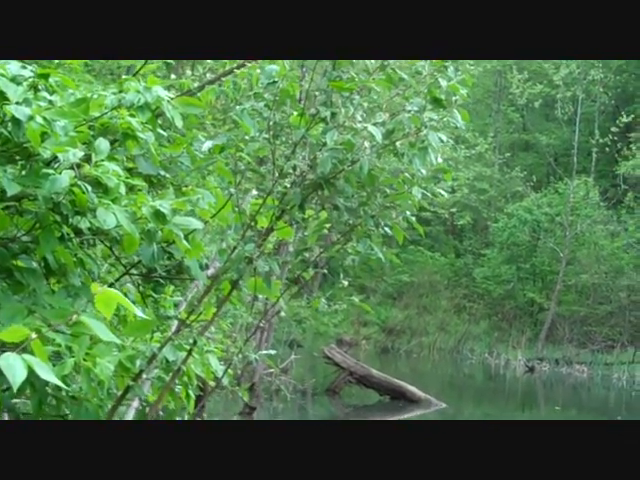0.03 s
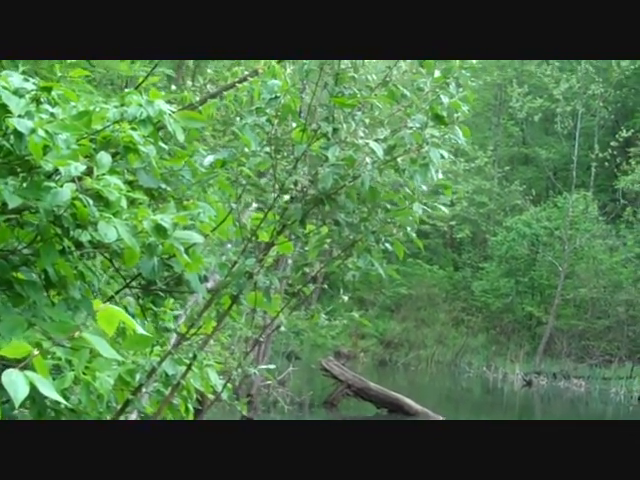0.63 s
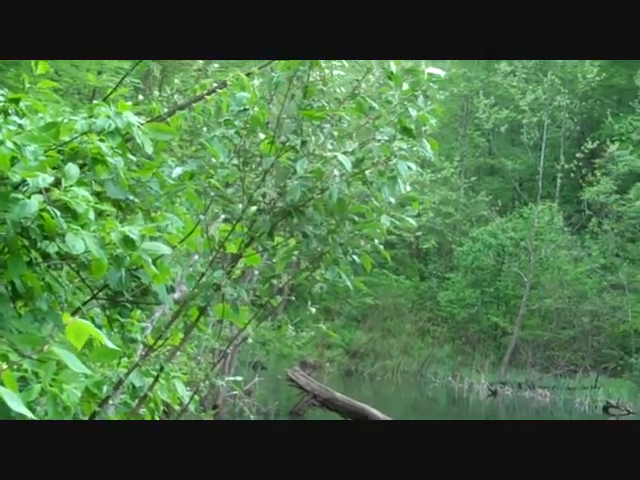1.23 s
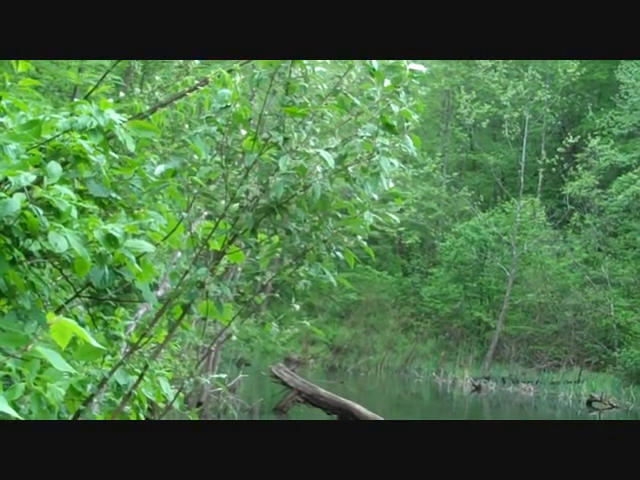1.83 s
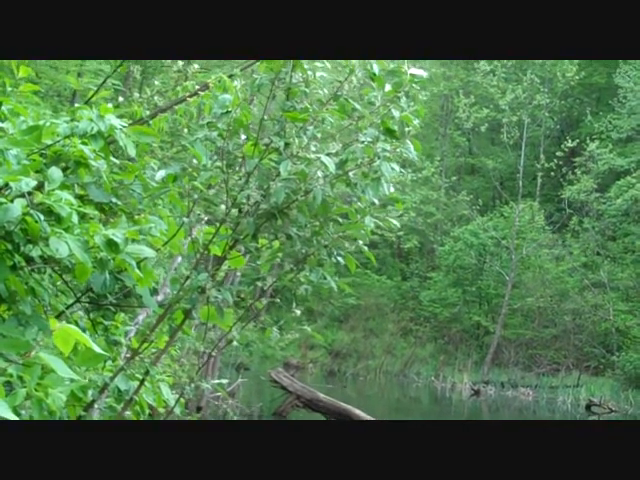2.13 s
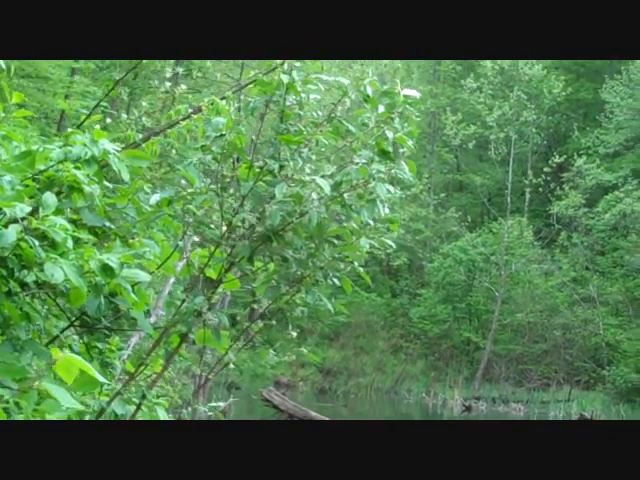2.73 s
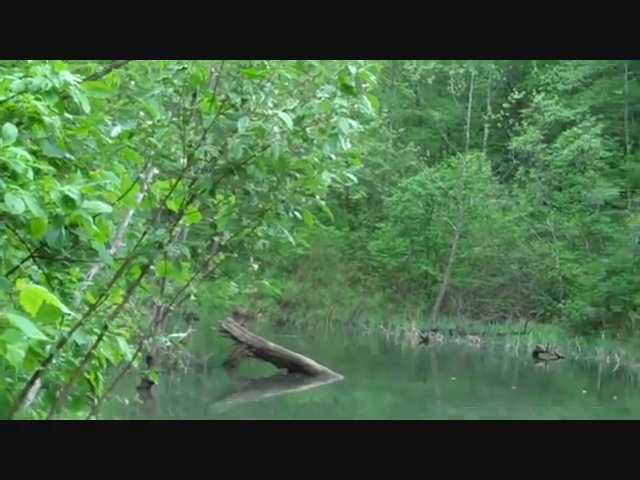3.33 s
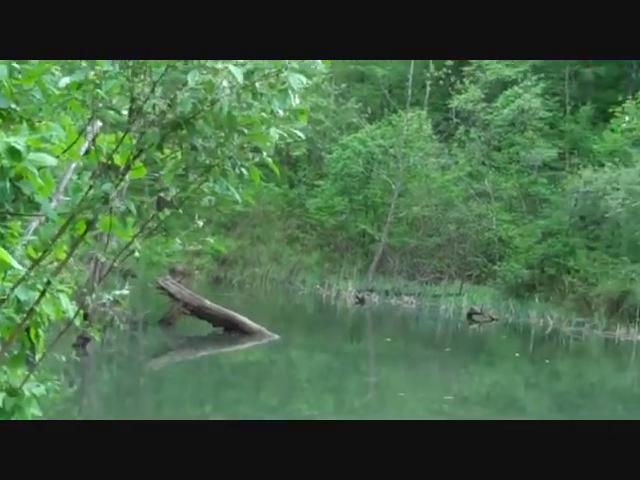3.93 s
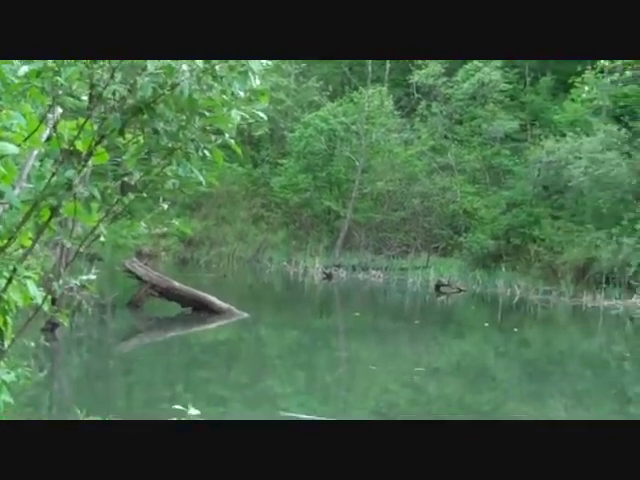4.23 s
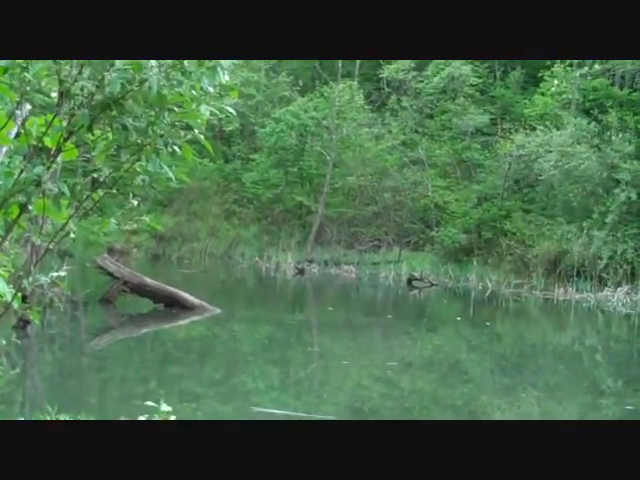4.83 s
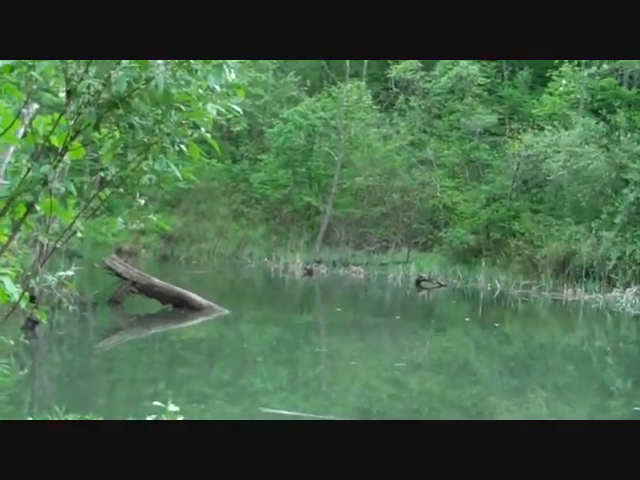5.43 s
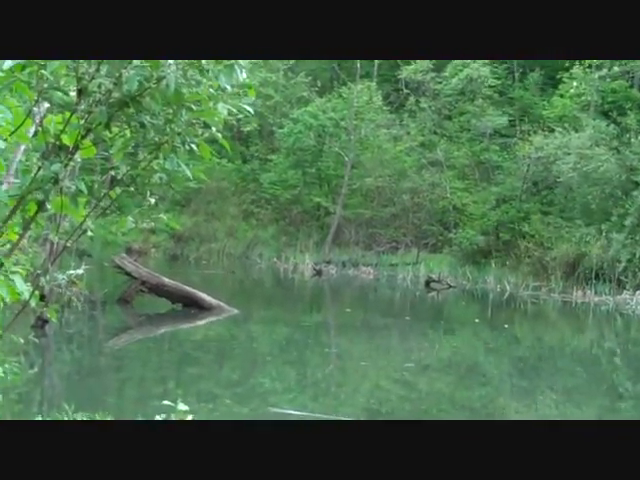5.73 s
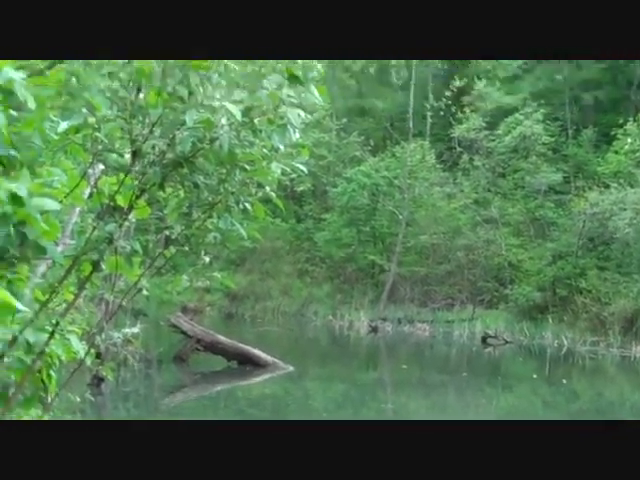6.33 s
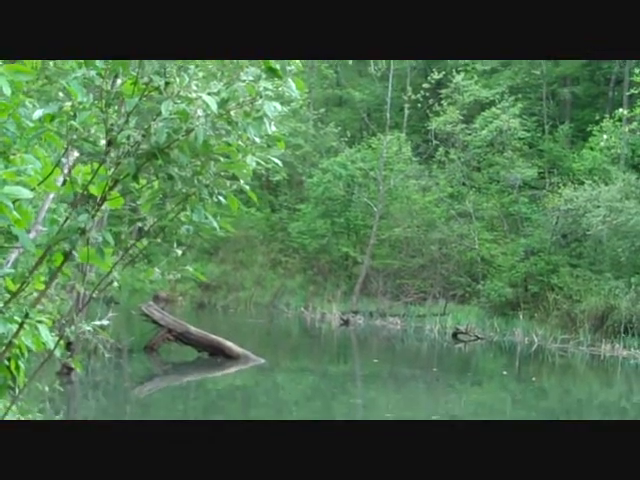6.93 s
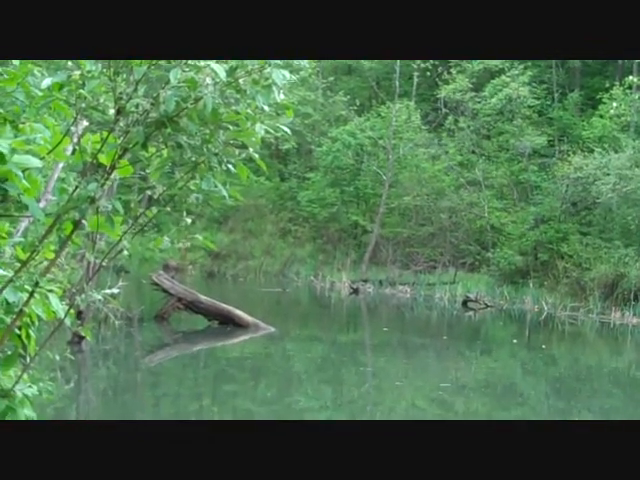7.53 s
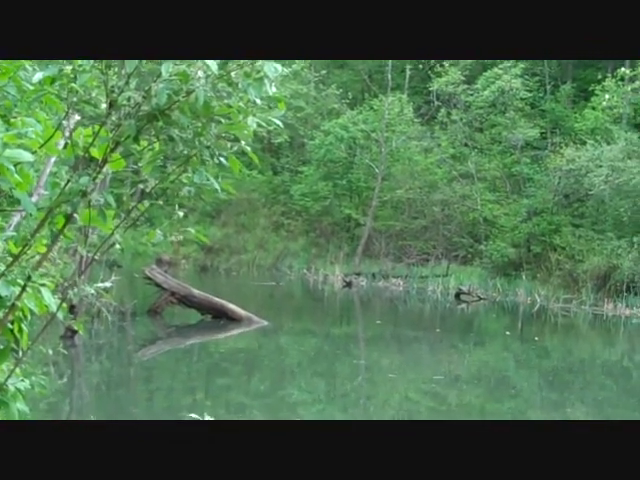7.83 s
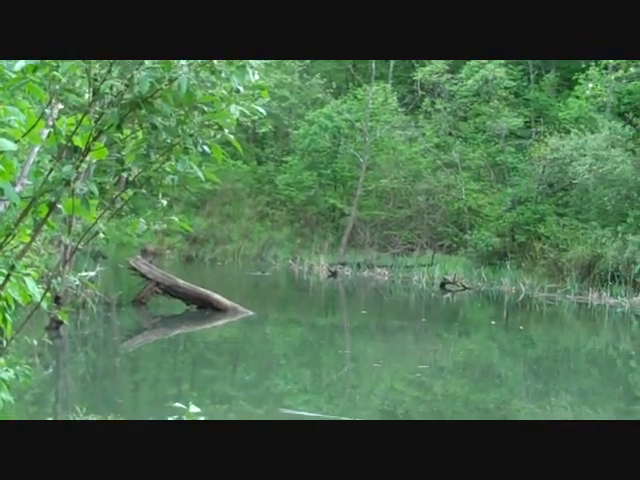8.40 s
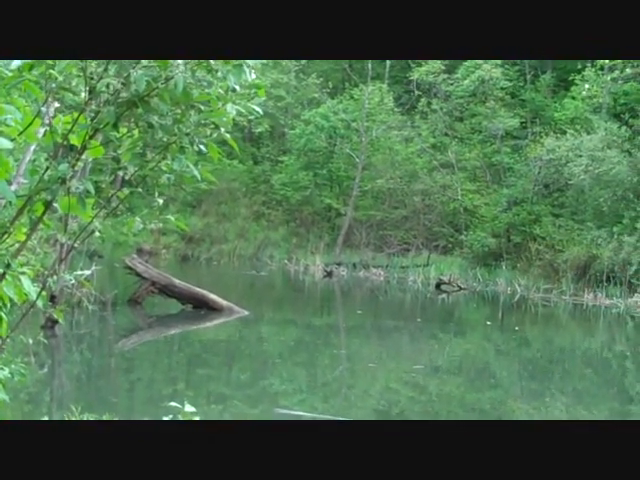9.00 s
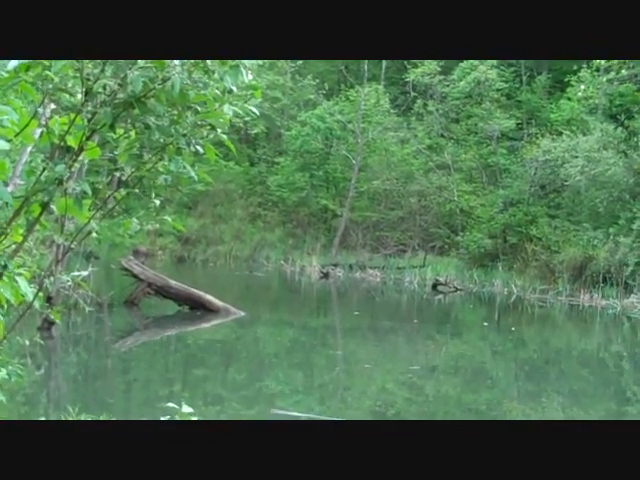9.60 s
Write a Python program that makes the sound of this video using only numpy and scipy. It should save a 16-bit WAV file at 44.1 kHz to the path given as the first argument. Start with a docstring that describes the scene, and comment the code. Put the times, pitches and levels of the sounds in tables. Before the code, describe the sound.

A soft hush of air and distant leaves runs throughout, by a woodland pond. For the first three seconds, leaves brush the handheld microphone, with a brief squeak at the start, and twigs click sharply against it, loudest near 2.7 seconds. Faint trills and chirps sound behind. A low finger bump comes at 3 seconds. Then a bird sings five high falling sweeps, growing louder, over a thin held whistle, and ends with a quick flourish from 4.1 to 4.7. A water bird gives six short, hoarse, faint hoots between 4.4 and 6.1. From 5.6 to 6.8 a slow fluted phrase on the left lingers among the trees. Occasional twig ticks and rustles return around 4, 4.5 and 5.6 seconds. From about 6.3, fingers lightly tap and rub the case while distant birds chatter, closing with quick trills from 9 to 9.5 seconds.

```python
"""Birds round a woodland pond

Small birds whistle sweeps, trills and fluted phrases, and a water bird hoots from the far bank.
Each note is a gliding tone that the trees scatter into a tail. Close by, twigs tick and leaves
brush against a handheld camera, and fingers ring its case, over a soft hush of air."""
import sys
import numpy as np
from scipy import signal
from scipy.fft import rfft, irfft, next_fast_len
from scipy.io import wavfile
from scipy.ndimage import uniform_filter1d

SR = 44100
rng = np.random.default_rng(int(sys.argv[2]) if len(sys.argv) > 2 else 0)


def persist_wave(psi):
    """Save psi, clipped to +-1, as 16-bit WAV."""
    counts = np.round(np.clip(psi, -1, 1) * 32767).astype(np.int16)
    wavfile.write(sys.argv[1], SR, np.atleast_2d(counts).T)


N = 426006

# The lead bird's falling sweep and the short note at its foot.
# Each holds: length in seconds, then start, middle and end pitch in Hz.
SWEEP_NOTE = (0.105, 8250, 7550, 6100)
FOOT_NOTE = (0.058, 7000, 6350, 6420)
# A thin held whistle that sags and recovers, and the lead bird's closing flourish.
# Each row: start and length in seconds, start, middle and end pitch in Hz, level in dB.
HELD_WHISTLE = [(3.40, 0.36, 4890, 4770, 4660, -66), (3.80, .35, 4610, 4730, 4820, -61)]
FLOURISH = [(4.113, 0.16, 5200, 4750, 4220, -54.5), (4.268, 0.07, 3480, 4205, 4850, -51),
            (4.32, 0.03, 4730, 4190, 3630, -57), (4.362, 0.03, 4930, 5300, 5550, -55),
            (4.38, 0.077, 5475, 5540, 5550, -54), (4.418, 0.056, 3457, 4140, 4740, -49),
            (4.464, 0.0287, 4560, 4170, 3720, -53.5), (4.47, 0.17, 5400, 5650, 5920, -65),
            (4.50, 0.029, 4680, 4340, 3900, -56), (4.536, 0.048, 3400, 2800, 2440, -59),
            (4.568, 0.053, 2430, 2308, 2430, -59), (4.608, 0.055, 2440, 3010, 3630, -59.5),
            (4.642, 0.041, 3780, 3450, 3050, -53)]

def near_song():
    """The lead bird's falling sweeps and flourish; a thin, wavering whistle sounds beneath."""
    sweeps = series(SWEEP_NOTE, first_s=3.176, period_s=.154, top_db=-46.5, swell_db=20, count=5)
    feet = series(FOOT_NOTE, first_s=3.265, period_s=.14, top_db=-53, swell_db=10, count=5)
    song = sing(sweeps + feet, waver=.012, overtone_db=-36, soft=.45)
    song += sing(HELD_WHISTLE, waver=.028, overtone_db=-36, soft=.4)
    song += sing(FLOURISH, waver=.017, overtone_db=-36, soft=.5)
    return woods(song, lead=2.4, wet_db=0, t60=1.8, left_db=-1, build_s=.025)


# The far birds' vocabulary. Each entry: length in seconds, then start, middle and end pitch in Hz.
SYLLABLES = {"rise": (.046, 2850, 3600, 4700), "fall": (0.04, 4780, 4400, 3800),
             "pip": (0.03, 2850, 3020, 2880), "thin": (0.14, 4980, 4780, 4810),
             "level": (.11, 2980, 3200, 3350), "arch": (0.0374, 3400, 3650, 2750),
             "plunge": (0.098, 7700, 5300, 2600), "low": (0.048, 2600, 2600, 2400),
             "drawl": (.13, 2380, 2680, 2920), "lift": (.06, 5020, 5200, 6000),
             "climb": (.058, 3600, 4600, 5800), "slide": (.028, 5700, 5500, 4450),
             "swing": (.04, 2600, 3050, 3300), "hook": (.05, 5100, 4480, 3600)}
# Their chatter. Each row: start in seconds, syllable, level in dB.
FAR_SONG = [(1.14, "drawl", -66), (1.345, "thin", -66.5), (1.44, "fall", -63), (2.58, "lift", -63),
            (2.642, "slide", -58), (2.728, "climb", -63), (2.782, "slide", -61), (2.835, "level", -68),
            (2.90, "pip", -63), (2.972, "swing", -65), (3.025, "low", -68), (3.222, "slide", -63),
            (5.414, "rise", -64.5), (5.484, "fall", -59.5), (6.845, "hook", -66), (6.98, "rise", -59),
            (7.032, "fall", -63), (7.157, "rise", -58), (7.321, "fall", -62), (7.43, "level", -70),
            (7.49, "fall", -66), (7.575, "fall", -62.5), (7.84, "rise", -69), (7.885, "hook", -65),
            (8.068, "rise", -64), (8.213, "fall", -66), (8.466, "level", -64.5), (8.686, "arch", -61.5),
            (8.809, "fall", -66), (8.818, "plunge", -59), (8.845, "rise", -58.5), (8.905, "low", -61)]

def far_birds(pip_ahead_s=.038, pip_db=-3):
    """Distant birds whistle stock syllables, with a softer pip just before every rise."""
    notes = [(s, *SYLLABLES[name], db) for s, name, db in FAR_SONG]
    pips = [(s - pip_ahead_s, *SYLLABLES["pip"], db + pip_db)
            for s, name, db in FAR_SONG if name == "rise"]
    song = sing(notes + pips, waver=.011, overtone_db=-34, soft=.5)
    return woods(song, lead=-2.3, wet_db=-.5, t60=1.2, left_db=2.5, build_s=.01)


# A slow fluted phrase, ending in the faint lingering ring of its last low note.
# Each row: start and length in seconds, start, middle and end pitch in Hz, level in dB.
FLUTED_PHRASE = [(5.598, 0.018, 2420, 2440, 2480, -58), (5.675, 0.033, 3105, 2600, 2410, -58),
                 (5.898, 0.089, 2400, 2450, 2430, -57.5), (5.98, 0.13, 3380, 3400, 3390, -63),
                 (6.035, 0.09, 2440, 2430, 2440, -61.5), (6.06, 0.17, 3380, 3455, 3500, -61.5),
                 (6.155, 0.089, 2720, 2830, 2840, -54), (6.21, 0.14, 2220, 2063, 2040, -58),
                 (6.31, 0.18, 2040, 2080, 2060, -66), (6.51, 0.29, 2080, 2037, 2060, -63.5)]

def fluting_bird():
    """Soft-edged whistles from the left that hang long among the trees."""
    song = sing(FLUTED_PHRASE, waver=.022, overtone_db=-38, soft=.7)
    return woods(song, lead=-4, wet_db=-4, t60=2.7, left_db=5, build_s=.03)


# Quick trills. Each row: start and length in seconds, pitch in Hz, pulses a second,
# pitch swing in Hz, level in dB.
TRILLS = [(0.682, 0.29, 2610, 21.4, 30, -63), (.693, 0.27, 2180, 24, 49.6, -59.5),
          (8.943, 0.445, 4410, 25, 620, -61.5), (9.002, 0.46, 2006, 17, 200.5, -64.5)]

def trilling_birds(uneven=.88):
    """Whistles that pulse quickly and a little unevenly, the pitch dropping within every pulse."""
    out = np.zeros(N)
    for s, length, hz, rate, swing_hz, db in TRILLS:
        n = int(length * SR)
        beat = 2 * np.pi * rate * np.arange(n) / SR + uneven * wobble(n, 12)
        pitch = hz + swing_hz * (np.sin(beat) + wobble(n, 200)) / 2
        tone = np.sin(2 * np.pi * np.cumsum(pitch) / SR)
        pulses = np.sin(beat / 2) ** 4
        add(out, s, amp(db) * unit(tone * pulses * signal.windows.tukey(n, .15)))
    return woods(out, lead=-4, wet_db=-4, t60=1.7, left_db=-1.5, build_s=.03)


# The shallow arch of every hoot: start, middle and end pitch in Hz.
HOOT_HZ = (833, 864, 854)
# Calls from the far bank. Each row: start and length in seconds, level in dB.
HOOTS = [(4.39, 0.086, -59), (4.655, 0.026, -60), (4.83, 0.041, -56.5), (5.076, 0.055, -59),
         (5.868, 0.14, -55), (6.018, 0.081, -53.5)]

def water_bird():
    """Short, hoarse hoots cross the pond with little scatter."""
    notes = [(s, length, *HOOT_HZ, db) for s, length, db in HOOTS]
    calls = sing(notes, waver=.11, overtone_db=-13, soft=.4)
    return woods(calls, lead=1.5, wet_db=-11, t60=.58, left_db=-4, build_s=.0019)


# Faint runs of notes. Each row: start and end in seconds, centre pitch in Hz, level in dB.
WARBLES = [(1.101, 1.3, 3570, -75), (2.62, 2.8, 5380, -74), (7.15, 7.7, 3650, -76.5),
           (7.699, 8.35, 3900, -79.5)]

def warbling_birds(step_s=.07, note_s=.05, wander=.089):
    """Notes that wander at random, so deep in the wood that mostly their scatter arrives."""
    notes = []
    for start, end, hz, db in WARBLES:
        for s, (late, *bends) in zip(np.arange(start, end, step_s), rng.standard_normal((24, 4))):
            arc_hz = hz * np.exp(wander * np.array(bends))
            notes.append((s + late * step_s / 10, note_s, *arc_hz, db))
    song = sing(notes, waver=.03, overtone_db=-34, soft=.5)
    return woods(song, lead=0, wet_db=10, t60=1.4, left_db=1, build_s=.03)


def series(note, first_s, period_s, top_db, swell_db, count):
    """One note repeated at a steady pace, swelling towards the last."""
    return [(first_s + k * period_s, *note, top_db - swell_db * (1 - k / (count - 1)) ** 2)
            for k in range(count)]


def sing(notes, waver, overtone_db, soft, flutter_db=2.9, flutter_hz=110, ease=.3):
    """Each note is a fluttering whistle easing along an arc of pitch; soft is the share spent fading."""
    out = np.zeros(N)
    for s, length, start_hz, middle_hz, end_hz, db in notes:
        n = int(length * SR)
        progress = np.linspace(0, 1, n)
        eased = (1 - ease) * progress + ease * np.sin(np.pi * progress / 2) ** 2
        hz = np.polyval(np.polyfit([0, .5, 1], [start_hz, middle_hz, end_hz], 2), eased)
        unsteady = waver * (.386 + 3 * min(np.ptp(hz) / middle_hz, .35))  # wide sweeps are rougher
        phase = 2 * np.pi * np.cumsum(hz * (1 + unsteady * wobble(n, 300))) / SR
        tone = np.sin(phase) + amp(overtone_db) * np.sin(2 * phase)
        flutter = amp(flutter_db * wobble(n, flutter_hz))
        add(out, s, amp(db) * unit(tone * flutter * signal.windows.tukey(n, soft)))
    return out


def woods(x, lead, wet_db, t60, left_db, build_s, early_gain=.9, early_s=.014):
    """The direct sound, then scatter from trunks and leaves that builds up over build_s."""
    echoes = rng.standard_normal((2, 2 * SR)) * (rng.random((2, 2 * SR)) < .06)
    hz, t, bands = signal.stft(echoes, SR, nperseg=256)
    band_t60 = t60 / (1 + (hz[:, None] / 7500) ** 3)  # the air takes the treble first
    decay = amp(-60 * t / band_t60) + early_gain * np.exp(-t / early_s)
    bands *= (1 - np.exp(-t / build_s)) * decay
    echoes = signal.istft(bands, SR, nperseg=256)[1]
    echoes /= np.linalg.norm(echoes, axis=1, keepdims=True)
    tail = signal.fftconvolve(x[None], echoes, axes=1)[:, :N]
    return pan(left_db) * (ports(x, lead) + amp(wet_db) * tail)


# Twigs hitting the camera. Each row: start in seconds, level in dB, ring pitch in Hz,
# woody body in dB relative to the ring.
TWIG_HITS = [(.102, -35, 3060, -13), (.387, -29, 6140, -26), (.401, -36.5, 7600, -18),
             (.512, -27, 7360, -36), (.634, -15.5, 6160, -20), (.814, -33, 7700, -2),
             (.996, -17, 8050, -10), (1.056, -14.5, 8300, -35), (1.102, -34, 5500, -8),
             (1.279, -20.5, 7300, -14), (1.693, -29.5, 7450, -18), (1.783, -27.5, 7840, -19),
             (2.147, -36, 7300, 5), (2.1685, -28, 7750, -3), (2.185, -25, 7650, -7),
             (2.2225, -16.5, 7200, -4.5), (2.413, -29, 7700, -21), (2.67, -6, 9000, -8.5),
             (2.6905, -23, 7700, 0.5), (2.766, -28, 6650, 3), (3.953, -27, 5800, -4),
             (4.116, -30.5, 8400, -25), (4.49, -16, 7000, -11.5), (5.636, -20, 6600, -2.5),
             (8.726, -29, 6760, -8)]
# The woody body. Each row: mode frequency in Hz, level in dB, seconds to fall 60 dB.
TWIG_MODES = [(1140, -37, 0.03), (2440, 16.5, 0.0034), (3600, 11, 0.0042), (5800, 14.5, 0.0051)]

def twig_ticks(leaves, ring_t60=.0025, crack_s=.001, splinter_s=.0052, shiver_s=.25, delay_s=.0016):
    """A sharp crack, a bright ring and a woody body, then splinters and a shiver of leaves."""
    out, t = np.zeros(N), np.arange(12000) / SR
    spray = colour(rng.standard_normal(N), LEAF_FIZZ)
    edge = colour(rng.standard_normal(N), LEAF_EDGES)
    crack = np.exp(-t / crack_s)
    shiver = np.exp(-t / shiver_s) * (1 - t / t[-1])
    fade = amp(-9) * crack + amp(-21) * np.exp(-t / splinter_s) + amp(-42) * shiver
    # Small extra ticks fall as foliage slides by.
    small = [(s, -38 + 2 * rng.standard_normal(), 7400, -8) for s in moments(leaves, count=10)]
    for s, db, hz, body_db in TWIG_HITS + small:
        stretch = np.arange(len(t)) + rng.integers(N - len(t))
        snap = ring([(hz, 0, ring_t60)], t) + amp(body_db) * ring(TWIG_MODES, t)
        hardness = amp(-21) * (hz / 7400) ** 4  # stiffer twigs ring higher and crack more crisply
        tick = snap + fade * spray[stretch] + hardness * crack * edge[stretch]
        add(out, s + delay_s, amp(db) * tick)
    return amp(.5) * pan(2.3) * ports(out, lead=2.96)


# Fingers on the case. Each row: start in seconds, level in dB, left over right in dB,
# pitch of the spot in Hz, brightness cutoff in Hz.
FINGER_TAPS = [(2.206, -21, 1, 1100, 5000), (2.691, -27.5, 0, 1260, 5000), (3.776, -36.5, 0, 1350, 4000),
               (4.052, -32.5, -10, 880, 4000), (4.154, -34, -1, 1130, 4000), (4.274, -42.5, -2, 730, 900),
               (6.339, -40, -5.5, 890, 1200), (6.39, -33.5, -5, 1400, 3980), (6.412, -38, -3, 1500, 3000),
               (6.449, -32.5, -8, 730, 903), (6.455, -36.5, -9, 690, 890), (6.464, -35, -5, 643, 908),
               (6.476, -38, -7, 704, 885), (6.486, -44, -5, 724, 908), (6.944, -44, -5, 750, 903),
               (7.035, -33.5, -2, 720, 1600), (7.077, -31, -5, 710, 1990), (7.102, -37, 3, 1050, 3000),
               (7.125, -28, -5, 765, 2200), (7.168, -25.5, -5, 694, 1900), (7.237, -38, 10, 1510, 5060),
               (7.613, -40, 2, 1050, 2040), (7.69, -40, 2.5, 1310, 2000), (7.953, -41, 2.5, 735, 1500),
               (8.8265, -32.5, 1.5, 566, 1500), (8.845, -40, 1, 460, 600), (8.865, -41, 1, 480, 1500),
               (8.94, -40, 2.5, 700, 900), (8.971, -42, 1, 330, 500), (9.047, -41, -5.5, 654, 800),
               (9.068, -34, -4, 734, 1300), (9.099, -40, -4, 680, 1000), (9.112, -40.5, 2, 570, 400),
               (9.252, -38, -3, 1600, 4000), (9.29, -48, 4, 520, 600), (9.306, -42, -1, 470, 1200),
               (9.428, -37.5, 4, 980, 1400), (9.434, -38, 4, 915, 1400)]
# The ring of the case. Each row: mode frequency in Hz, level in dB, seconds to fall 60 dB.
CASE_MODES = [(570, -33, 0.028), (788, 23.5, 0.027), (1000, 25.5, 0.011), (1600, 26, 0.0095),
              (2390, -10, .006)]

def finger_taps(grip, scuff_db=-25, scuff_s=.011, spot_spread=.43):
    """Taps ring the case, higher or lower with the spot touched; a soft fingertip dulls them."""
    out, t = np.zeros((2, N)), np.arange(2000) / SR
    scuff = colour(rng.standard_normal(N), CASE_RUB)
    # Small extra taps come as the grip shifts.
    small = [(s, -44 + 2 * rng.standard_normal(), -1,
              620 * np.exp(spot_spread * rng.standard_normal()), 1200) for s in moments(grip, count=20)]
    for k, (s, db, left_db, spot_hz, bright_hz) in enumerate(FINGER_TAPS + small):
        shift = spot_hz / CASE_MODES[1][0]
        modes = [(hz * shift, level + rng.standard_normal(), t60) for hz, level, t60 in CASE_MODES]
        knock = ring(modes, t) + amp(scuff_db) * np.exp(-t / scuff_s) * scuff[k * len(t):][:len(t)]
        fingertip = signal.butter(2, min(bright_hz, SR / 4), fs=SR, output="sos")
        knock = signal.sosfilt(fingertip, knock)
        add(out, s, amp(db) * pan(left_db) * knock / abs(knock).max())
    return ports(out, lead=-4)


# A finger lands beside the left microphone port: time in seconds, pitch in Hz, peak in dB.
PORT_BUMP = (3.0475, 148, -16)
# It drags away. Each row: start and length in seconds, pitch in Hz, left and right level in dB.
FINGER_DRAGS = [(3.05, 0.093, 130, -44.5, -64), (3.13, .15, 45.2, -66, -56)]

def finger_bump():
    """One push of pressure on the left port, then a low stuttering drag."""
    out = np.zeros((2, N))
    s, hz, db = PORT_BUMP
    lapse_squared = (np.pi * hz * (np.arange(N) / SR - s)) ** 2
    out[0] = amp(db) * (1 - 2 * lapse_squared) * np.exp(-lapse_squared)
    for s, length, hz, left_db, right_db in FINGER_DRAGS:
        n = int(length * SR)
        spectrum = [(hz / 8, -25), (hz / 2, -1), (hz, 0), (hz * 3, -14), (hz * 6, -50), (SR / 2, -100)]
        rumble = unit(colour(rng.standard_normal(N), spectrum)[:n])
        add(out, s, amp([[left_db], [right_db]]) * rumble * signal.windows.tukey(n, .3))
    return out


# A leaf drags hard across the case: peak time and length in seconds, level in dB.
SQUEAK_STROKE = (0.015, 0.097, -40.5)
# Its tone. Each row: frequency in Hz, level in dB.
SQUEAK_TONE = [(30, -45), (340, -18), (405, 6), (480, -30), (1500, -25), (2900, -10), (4500, -21),
               (5950, -21), (6280, 4), (6700, -7.5), (7700, -9), (9000, -15), (14000, -20)]

def leaf_squeak():
    """A leaf sticks and slips, singing in a narrow high band with a low hum from the case."""
    squeak = strokes([SQUEAK_STROKE]) * colour(rng.standard_normal(N), SQUEAK_TONE)
    return pan(1.9) * ports(squeak, lead=1.7)


# The tones of dry leaf surfaces, scraping leaf edges, the rubbed case and the case flexing in the hand.
# Each row: frequency in Hz, level in dB.
LEAF_FIZZ = [(60, -42), (500, -32), (1500, -5.5), (3000, -1), (4800, -5), (6200, 7), (8000, 9.5),
             (10000, 1), (14000, 0)]
LEAF_EDGES = [(60, -62), (5000, -48), (9000, -1), (11000, -2), (14000, 4)]
CASE_RUB = [(40, -34), (150, -23.5), (400, -2), (800, -3.5), (1400, -2), (2500, -11), (4000, -6.5),
            (8000, -17.5)]
CASE_FLEX = [(15, -19), (50, -9), (110, -2), (300, -7), (800, -48), (14000, -90)]

def rustle(leaves, grip, slips_per_s=4000, spread_db=4, width=.54, through_case_db=-9.5):
    """Dense tiny slips: leaves fizz, crisper when pressed hard; the case rubs dully and flexes."""
    slips = amp(spread_db * np.minimum(rng.exponential(1, N), 4)) * rng.choice([-1, 1], N)
    slips *= rng.random(N) < slips_per_s / SR
    grains = ports(unit(slips), lead=2.8) + width * rng.standard_normal((2, N))
    fizz = leaves * colour(grains, LEAF_FIZZ)
    scrape = amp(-40) * (leaves / leaves.max()) ** 1.8 * colour(grains, LEAF_EDGES)
    rub = (grip + amp(through_case_db) * leaves) * colour(grains, CASE_RUB)
    flex = amp(-14) * grip * colour(grains, CASE_FLEX)
    return pan(.77) * (fizz + scrape + rub + flex)


# Leaves sliding past, and the hand shifting its grip.
# Each row: peak time and length in seconds, level in dB.
LEAF_STROKES = [(.022, .11, -46.5), (1.023, .11, -36), (1.615, .1, -46.5), (1.85, 0.028, -48.5),
                (2.07, 0.13, -44), (3.11, 0.085, -54), (3.74, 0.26, -49), (4.056, 0.046, -48),
                (4.15, 0.038, -46), (5.65, .045, -52), (6.397, 0.019, -43.5), (7.06, .08, -54),
                (9.315, .06, -51.5)]
GRIP_SHIFTS = [(.04, .1, -58), (.35, .15, -61), (4.05, .2, -55.5), (5.64, 0.013, -44), (5.68, .25, -60),
               (6.45, .22, -57), (7.09, .15, -55), (7.62, .1, -54), (8.85, .08, -52), (9.19, .14, -55)]
# Light, constant contact with foliage. Each row: time in seconds, level in dB.
BRUSHING = [(0, -57), (0.85, -54.5), (1.397, -65), (2.401, -54.5), (2.999, -71), (5.101, -77.5),
            (5.649, -56), (6.201, -71), (9.66, -78)]

def contact():
    """Two gain envelopes: how hard the leaves and the hand rub the camera."""
    brushing = amp(np.interp(np.arange(N) / SR, *np.transpose(BRUSHING)))
    return strokes(LEAF_STROKES) + brushing, strokes(GRIP_SHIFTS)


def strokes(rows, rise_share=.45):
    """The summed gain of sliding contacts, each swelling to its peak and dying away."""
    t, gain = np.arange(N) / SR, np.zeros(N)
    for s, length, db in rows:
        span = slice(max(int((s - 2 * length) * SR), 0), int((s + 2 * length) * SR))
        lapse = (t[span] - s) / length
        share = np.where(lapse < 0, rise_share, 1 - rise_share)
        gain[span] += amp(db) * np.exp(-abs(lapse / share) ** 1.4)
    return gain


# The tone of the air bed. Each row: frequency in Hz, level in dB.
HUSH_TONE = [(12, -30), (25, 1.5), (70, 3.5), (170, 1), (300, 1.5), (450, 2), (800, 3), (1400, 2),
             (2200, 1), (3500, -3.5), (5500, -2.5), (7400, -1.5), (9000, -7.5), (14000, -24)]
# Its swell. Each row: time in seconds, level in dB.
BREEZE = [(0, 0.5), (1.4, -2), (3.2, -1.2), (4.1, 1.5), (4.9, -1.5), (6.4, 0.5), (9.3, 0.9), (9.66, -1)]
# Its stereo width. Each row: frequency in Hz, left-right correlation.
HUSH_LIKENESS = [(60, -0.24), (150, 0.72), (380, 0.37), (950, 0.74), (2380, 0.16), (5960, -0.32),
                 (15000, 1)]
# Its balance. Each row: frequency in Hz, left over right in dB.
HUSH_BALANCE = [(60, 1.5), (200, 6.5), (800, 4.5), (2000, 2.5), (5000, 0.5), (9000, -2.5)]

def hush(level_db=-54, patchy_db=1.5):
    """Distant leaves and air, drifting in patches."""
    frames, hz = N // 256 + 5, np.fft.rfftfreq(1024, 1 / SR)
    a, b, c, d, patches = rng.standard_normal((5, frames, len(hz)))
    left, unrelated = a + 1j * b, c + 1j * d
    likeness = np.clip(read(HUSH_LIKENESS, hz), -1, 1)
    bands = np.array([left, likeness * left + np.sqrt(1 - likeness ** 2) * unrelated])
    patches = unit(uniform_filter1d(uniform_filter1d(patches, size=16, axis=0), size=10, axis=1))
    swell = np.interp(np.arange(frames) * 256 / SR, *np.transpose(BREEZE))[:, None]
    leafy = read([(150, .28), (600, 1)], hz)  # the bass drifts least
    bands *= amp(read(HUSH_TONE, hz) + leafy * (swell + patchy_db * patches))
    bands *= amp(np.array([.5, -.5])[:, None, None] * read(HUSH_BALANCE, hz))
    air = signal.istft(bands.transpose(0, 2, 1), nperseg=1024, noverlap=768)[1][:, :N]
    return amp(level_db) * unit(air)


def ring(modes, t):
    """Struck modes with a peak of 1; so small a thing radiates no bass."""
    x = sum(amp(db - 60 * t / t60) * np.sin(2 * np.pi * hz * t) for hz, db, t60 in modes)
    x = signal.sosfilt(signal.butter(2, 420, "high", fs=SR, output="sos"), x)
    return x / abs(x).max()


def moments(gain, count):
    """Random times in seconds, crowding where the contact is strong."""
    share = (np.arange(count) + rng.random(count)) / count
    return np.searchsorted(np.cumsum(gain) / gain.sum(), share) / SR


def ports(x, lead):
    """Two close microphone ports: the left one hears the sound earlier by lead samples."""
    size = next_fast_len(N + 64)
    delay = np.exp(-1j * np.pi * np.fft.rfftfreq(size) * np.array([[-lead], [lead]]))
    return irfft(rfft(x, size) * delay, size)[:, :N]


def pan(left_db):
    """Left and right gains whose mean is 1."""
    gains = amp([[left_db / 2], [-left_db / 2]])
    return gains / gains.mean()


def wobble(n, hz):
    """A random drift that glides to a new value hz times a second."""
    return np.interp(np.arange(n) * hz / SR, np.arange(1000), rng.standard_normal(1000))


def colour(x, points):
    """Filters x by a curve of (Hz, dB) points, to rms 1."""
    return unit(irfft(rfft(x) * amp(read(points, np.fft.rfftfreq(N, 1 / SR))), N))


def read(points, hz):
    """A curve joined by straight lines on a log frequency axis."""
    corners_hz, value = np.transpose(points)
    return np.interp(np.log(hz + 1), np.log(corners_hz + 1), value)


def add(mix, s, sound):
    """Mixes a sound in at s seconds."""
    part = mix[..., max(round(s * SR), 0):][..., :sound.shape[-1]]
    part += sound[..., :part.shape[-1]]


def amp(db):
    """Decibels to gain."""
    return 10 ** (np.asarray(db) / 20)


def unit(x):
    """Scales to rms 1."""
    return x / np.sqrt(np.mean(x ** 2) + 1e-20)


def scene():
    """Birds at several distances, handling noises at the camera, and the hush."""
    birds = near_song() + far_birds() + warbling_birds() + trilling_birds()
    birds += fluting_bird() + water_bird()
    leaves, grip = contact()
    handling = twig_ticks(leaves) + finger_taps(grip) + rustle(leaves, grip)
    handling += leaf_squeak() + finger_bump()
    return birds + handling + hush()


# Each port has its own cavity resonance and rolls off above it. Each row: frequency in Hz, gain in dB.
LEFT_PORT = [(1000, -2.5), (3500, 4), (5400, 0.5), (6500, 5), (7400, 7.5), (8400, 0.5), (10000, -2.5),
             (14000, -11.5)]
RIGHT_PORT = [(1500, -1.5), (2700, 1), (4200, 5), (6200, 7), (7200, -8.5), (8400, -13.5), (12000, -22),
              (14000, -32)]

def record(dry, hiss_db=-63.5, cutoff_hz=14400):
    """The colour of the two ports, the hiss of the microphones and the band limit."""
    hz = np.fft.rfftfreq(N, 1 / SR)
    x = irfft(rfft(dry) * amp([read(LEFT_PORT, hz), read(RIGHT_PORT, hz)]), N)
    x += amp(hiss_db) * rng.standard_normal((2, N))
    lowpass = signal.firwin(301, cutoff_hz, window=("kaiser", 8), fs=SR)
    return signal.oaconvolve(x, lowpass[None], "same")


dry = scene()
out = record(dry)
persist_wave(out)
```